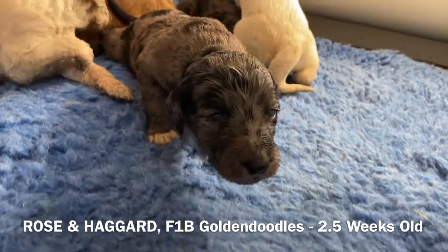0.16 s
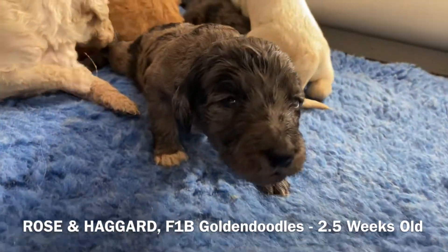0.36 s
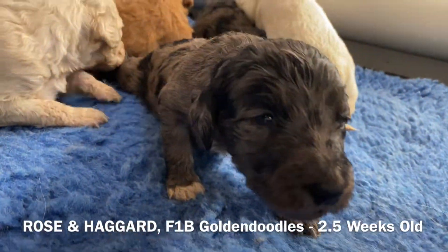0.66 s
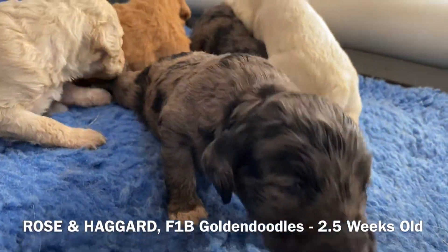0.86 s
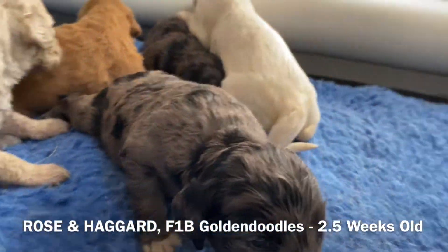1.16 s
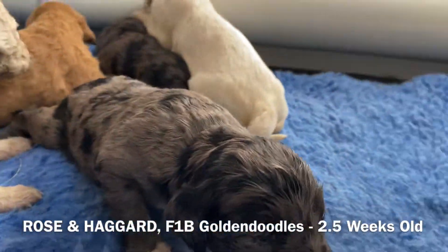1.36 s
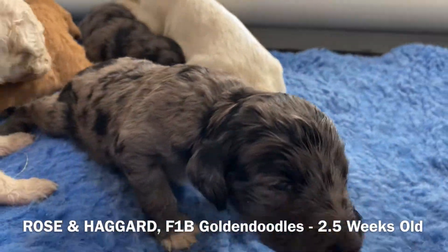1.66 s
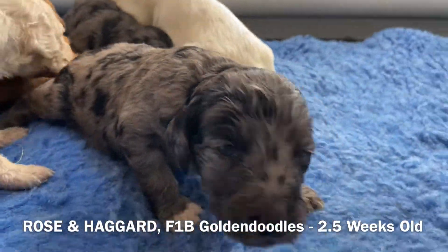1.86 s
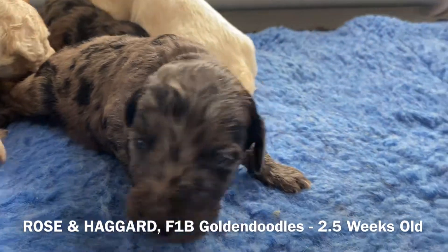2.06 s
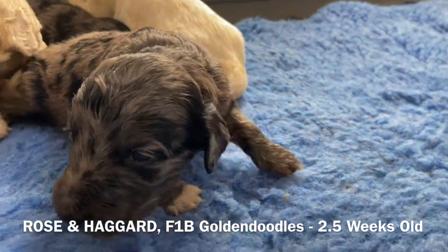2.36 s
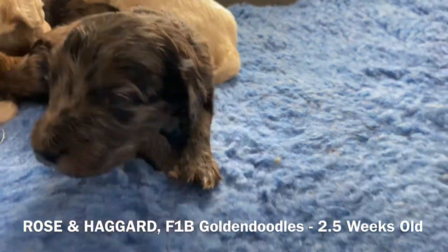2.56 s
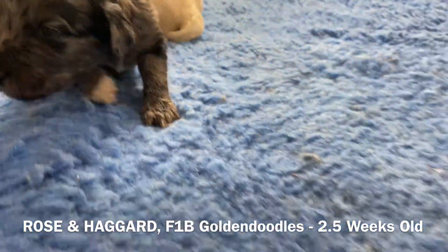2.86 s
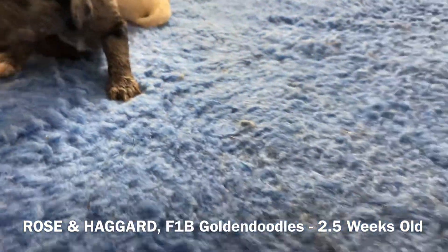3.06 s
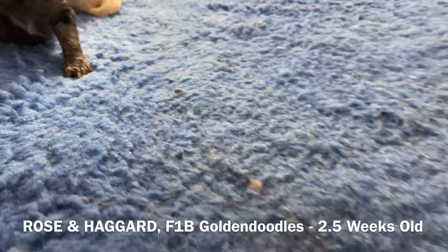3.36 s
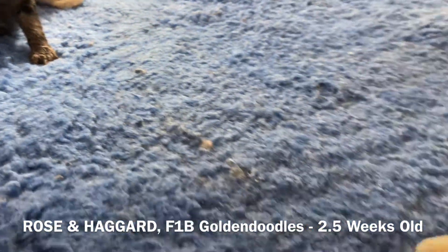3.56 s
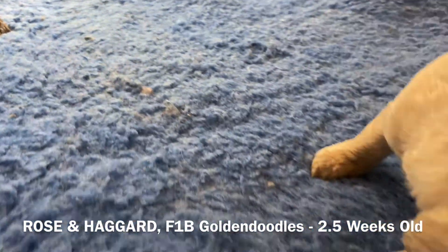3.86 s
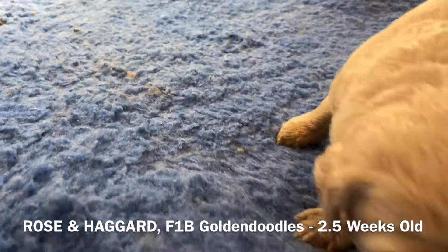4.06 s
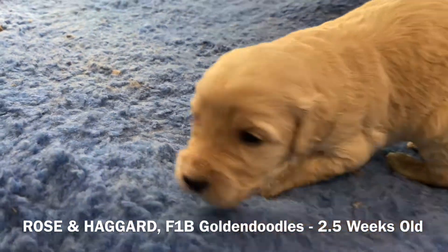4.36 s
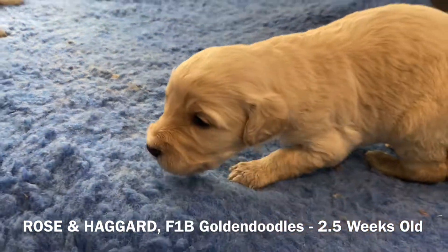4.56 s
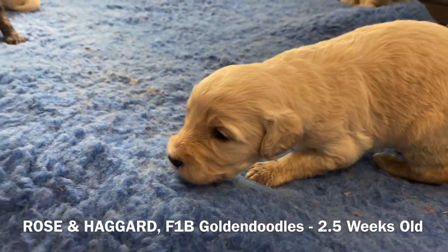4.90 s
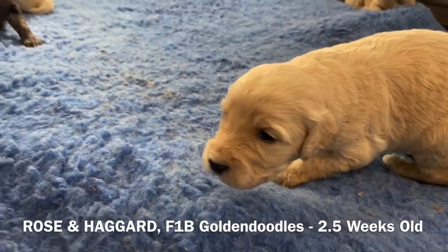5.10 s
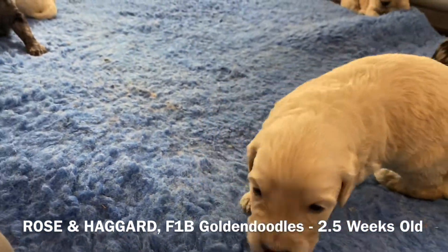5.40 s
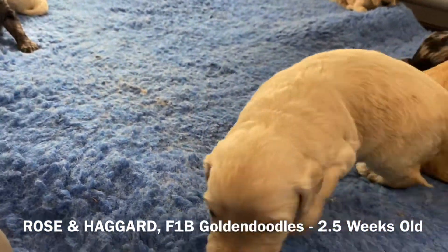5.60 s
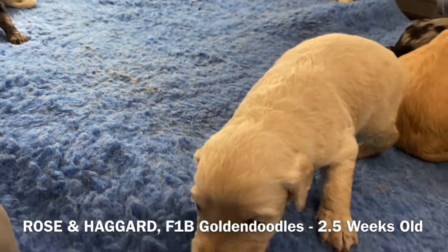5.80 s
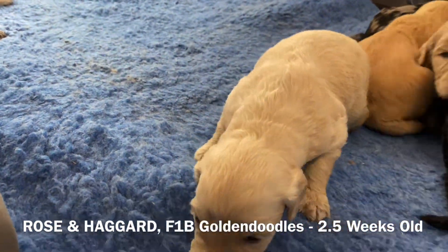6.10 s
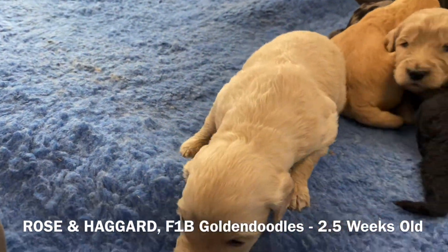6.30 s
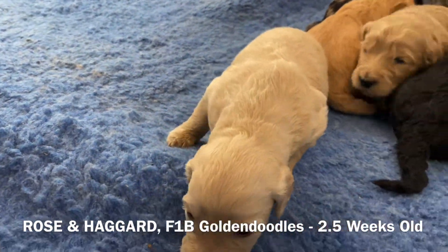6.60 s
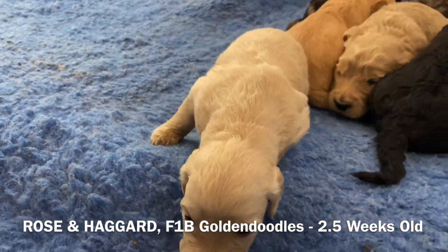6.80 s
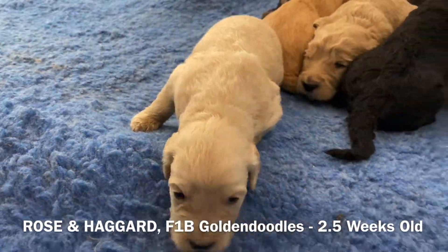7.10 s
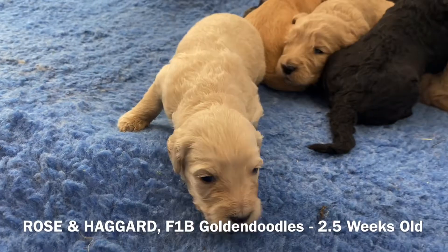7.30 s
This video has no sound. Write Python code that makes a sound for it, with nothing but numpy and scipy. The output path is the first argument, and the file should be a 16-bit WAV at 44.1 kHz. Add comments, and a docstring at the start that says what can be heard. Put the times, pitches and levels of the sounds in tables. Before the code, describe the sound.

Tiny puppies squeak and grunt on thick bedding, soft bumps underneath, one sharp knock, then a close groan sagging into a growl.

```python
"""A bare room with thick bedding, where young puppies lie, heard by a hand-held phone.
Far puppies whimper in shaky squeaks that the room draws out; near ones grunt and groan through closed
mouths: both are stacks of sine partials, and the grunts add breath noise. Noses whistle with wavering
sines; knocks, ticks and sniffs are short noise bursts, struck things ring in fading sines,
and shaken floor modes bump the phone under patchy noise for the air and stirring bodies."""
import sys
import numpy as np
from scipy import signal
from scipy.fft import rfft, irfft, next_fast_len
from scipy.io import wavfile
from scipy.ndimage import uniform_filter1d

SR = 44100
rng = np.random.default_rng(int(sys.argv[2]) if len(sys.argv) > 2 else 0)


def wav_out(sig):
    """Save sig, one row per channel (or a flat mono array), as 16-bit PCM at SR to the path in sys.argv[1]."""
    wavfile.write(sys.argv[1], SR, np.round(np.clip(np.atleast_2d(sig).T, -1, 1) * 32767).astype(np.int16))


N = 328545  # length of the scene [samples]

# How fast the room's echo dies in each band: (frequency [Hz], time to fall 60 dB [s])
ROOM_DECAY = [(100, 0.85), (500, 0.22), (1000, 0.56), (2500, 0.56), (5000, 0.47), (10000, 0.32)]
# Knocks, ticks and sniffs: (start [s], level [dB], rise [s], time to fall 60 dB [s],
# treble tilt [dB], positive is brighter)
NOISE_BURSTS = [(0, -43.5, 0.0006, 0.17, -5), (.555, -50, 0.021, 0.77, -5.5),
                (1.143, -54.5, 0.037, 0.27, 5.5), (2.162, -47.5, 0.011, 0.34, -1.5),
                (2.292, -38, 0.00032, 0.22, 1), (3.075, -48, 0.028, 1, 0.5),
                (3.61, -48.5, 0.00033, 0.083, -2), (3.682, -44, 0.0029, 0.24, -1.5),
                (3.841, -25.5, 0.00083, 0.07, 6.5), (3.853, -22, 0.0043, 0.03, -24),
                (4.166, -56, 0.015, 0.41, 2), (4.455, -50, 0.004, 0.25, 1.0),
                (5.099, -42, 0.19, 0.074, -40.5), (5.255, -49.5, 0.0054, 0.73, 6.5),
                (6.606, -42, 0.0075, 0.1, -12), (6.625, -42, 0.0031, 0.061, -4.5),
                (6.94, -49, 0.0016, 0.015, -3), (7.213, -42, 0.0017, 0.015, -6.5),
                (7.4, -51.5, 0.004, 0.44, 0.5)]


def amp(db):
    """Turn decibels into a plain factor."""
    return 10 ** (np.asarray(db) / 20)


def evened(x):
    """Scale a signal to an rms of 1."""
    return x / np.sqrt(np.mean(x ** 2) + 1e-20)


def read(points, hz):
    """Read a curve of (frequency, value) points, joined by straight lines over log frequency."""
    f, value = np.transpose(points)
    return np.interp(np.log(hz + 1), np.log(f + 1), value)


def add(mix, s, sound):
    """Lay a sound into the mix at s seconds, cut off at the end of the mix."""
    part = mix[round(s * SR):][:len(sound)]
    part += sound[:len(part)]


def columns(rows):
    """Give the start time, then every other column of a table at each sample."""
    s, *rest = np.transpose(rows)
    t = np.arange(s[0], s[-1], 1 / SR)
    return [s[0]] + [np.interp(t, s, c) for c in rest]


def wander(count, width_s):
    """Make a slow random drift of rms 1 by smoothing noise twice."""
    size = max(int(width_s * SR), 2)
    smooth = uniform_filter1d(rng.standard_normal(count), size)
    return evened(uniform_filter1d(smooth, size))


def coloured(count, points):
    """Make noise of rms 1 with the given spectrum."""
    hz = np.fft.rfftfreq(count, 1 / SR)
    spectrum = rfft(rng.standard_normal(count)) * amp(read(points, hz))
    return evened(irfft(spectrum, count))


def pair(a, b):
    """Mix two unrelated spectra (bins x frames) into partly alike ones for the two microphone ports."""
    # How alike the ports hear spread-out sound: (frequency [Hz], likeness [0-1])
    likeness = [(250, 0.53), (1100, 1), (2400, 0.032), (4500, 0.55), (10000, 1)]
    same = np.clip(read(likeness, np.linspace(0, SR / 2, len(a))), 0, 1)[:, None]
    return np.array([a, same * a + np.sqrt(1 - same ** 2) * b])


def bumps():
    """Shake floor modes at random, with duller shuffling above them; thuds climb and then die away."""
    # Thuds through floor and hand: (peak time [s], rise [s], time to fall 60 dB [s],
    # floor level [dB], shuffling level [dB])
    thuds = [(.14, 0.17, 0.7, -30.5, -68), (.97, 0.011, 0.74, -34, -61.5), (1.221, 0.48, 0.11, -44, -49),
             (1.869, 0.083, 0.88, -29.5, -48), (2.24, 0.073, 1.64, -36.5, -50.5),
             (2.78, 0.24, 0.72, -64, -47), (3.63, 0.091, 2.9, -41, -45), (3.8, 0.26, 0.23, -40, -64),
             (3.875, 0.011, 0.42, -23, -23), (3.959, 0.095, 0.57, -21, -53.5), (4.3, 0.38, 2.3, -41, -56.5),
             (6.08, 0.1, 0.16, -41.5, -56), (6.95, 0.25, 0.54, -41, -76), (7.1, 0.17, 0.32, -68, -51)]
    # Ways the floor likes to shake: (frequency [Hz], width [Hz], level [dB])
    floor_modes = [(55.1, 18.7, 2), (84.3, 11.2, -3), (108.4, 13, -15)]
    rest_db, rest_shuffle_db = -53, -59  # steady levels that the thuds add to
    thud_rise_db = 18.5  # climb during each rise time
    t, hz = np.arange(0, N, 64) / SR, np.fft.rfftfreq(N, 1 / SR)
    s, rise, t60, bump_db, shuffle_db = np.transpose(thuds)[:, :, None]
    shape_db = np.where(t < s, thud_rise_db * (t - s) / rise, -60 * (t - s) / t60)

    def strength(steady_db, peak_db):
        """Add the powers of the steady level and all thuds, at every sample."""
        power = amp(steady_db) ** 2 + (amp(peak_db + shape_db) ** 2).sum(0)
        return np.interp(np.arange(N) / SR, t, np.sqrt(power))

    modes = sum(amp(db) / (1 + (2 * (hz - f) / width) ** 2) for f, width, db in floor_modes)
    shake = signal.hilbert(irfft(rfft(rng.standard_normal(N)) * modes, N))
    shake = evened((shake / abs(shake) ** 0.046).real)  # dips slightly shallower than in free noise
    shuffle = coloured(N, [(110, -24), (150, 7.0), (220, -2.0), (330, -5.5), (600, -46.0), (1200, -59)])
    return strength(rest_db, bump_db) * shake + strength(rest_shuffle_db, shuffle_db) * shuffle


def air():
    """Make room air and soft rustle from noise that is patchy in time and pitch."""
    # Spectrum before stirring and patches: (frequency [Hz], level [dB per Hz])
    air_colour = [(30, -100.5), (60, -81), (200, -90.5), (350, -106), (520, -114), (850, -93.5),
                  (1300, -100), (3000, -115), (5000, -114), (8000, -123), (12000, -135), (16000, -146)]
    # How much the stirring bodies raise it: (time [s], rise [dB])
    stirring = [(0, 13.5), (.45, 4), (1.1, 5.5), (1.3, 7.5), (1.9, 0.5), (2.3, 17.5), (2.62, 8.5),
                (3.15, 17.5), (3.45, 13), (3.7, 15.5), (4.4, 7.5), (4.901, 5), (6.2, 12), (6.55, 7.5),
                (6.7, 8.5), (7.45, 12.5)]
    frames, hz = N // 256 + 5, np.fft.rfftfreq(1024, 1 / SR)
    a, b, c, d, patches = rng.standard_normal((frames, 513, 5)).T
    patches = evened(uniform_filter1d(uniform_filter1d(patches, 14, 0), 14, 1))
    db_per_bin = 10 * np.log10(SR / 1024)
    stir_db = np.interp(np.arange(frames) * 256 / SR, *np.transpose(stirring))
    level_db = read(air_colour, hz)[:, None] + db_per_bin + 3.32 * patches + stir_db
    z = pair(a + 1j * b, c + 1j * d) * amp(level_db)
    return signal.istft(z, nperseg=1024, noverlap=768)[1][:, :N]


def tilted(tilt_db):
    """Give a burst's spectrum as (frequency [Hz], level [dB]), with a strong hump at 800 Hz."""
    return [(100, 7), (400, -tilt_db), (800, 37.5), (12800, 4 * tilt_db), (16000, 4 * tilt_db - 11.0)]


def burst(level_db, rise, t60, tilt_db):
    """Make a knock, tick or sniff from tilted noise that rises and dies."""
    t = np.arange(16000) / SR
    noise = coloured(len(t), tilted(tilt_db))
    fall = amp(level_db - 60 * np.maximum(t - rise, 0) / t60)
    return fall * np.minimum(t / rise, 1) * noise


def burst_tails():
    """Add the spread-out echo after each burst: its spectrum dies band by band as the room does."""
    hz, t = np.fft.rfftfreq(256, 1 / SR), np.arange(N // 64 + 5) * 64 / SR
    power = np.zeros((len(hz), len(t)))
    for s, level_db, rise, t60, tilt_db in NOISE_BURSTS:
        colour = amp(read(tilted(tilt_db), hz)) ** 2
        colour = (colour / colour.sum())[:, None]
        since = np.maximum(t - s - rise - .006, 0)
        energy = amp(level_db) ** 2 * (rise + t60 / 5)
        decay = amp(-120 * since / read(ROOM_DECAY, hz)[:, None])  # 120, as this is power
        power += energy * colour * decay * (since > 0)
    a, b, c, d = rng.standard_normal((len(t), len(hz), 4)).T
    z = pair(a + 1j * b, c + 1j * d) * np.sqrt(power)
    return amp(13.5) * signal.istft(z, nperseg=256, noverlap=192)[1][:, :N]


def grunt(breath_db, first_db, rows):
    """Voice a closed mouth: rough folds shake pitch and strength and leak noise; breath puffs each cycle."""
    # Throat and closed mouth as a filter: (frequency [Hz], level [dB])
    throat = [(120, -18.5), (230, 2.5), (480, -7), (820, -2.5), (1050, -24), (1250, -19), (1600, -18),
              (2200, -29.5), (2700, -43), (3200, -49)]
    # Colour of the breath noise: (frequency [Hz], level [dB])
    breath_colour = [(1000, -19), (2000, -36), (3000, 9.5), (7300, 7), (8500, 13), (11800, 10.5),
                     (12800, -43), (16000, -38)]
    s, hz, effort_db, rough = columns(rows)
    count, k, rough = len(hz), np.arange(1, 14)[:, None], np.clip(rough, 0, 1)
    below_peak_db = effort_db - effort_db.max()
    turns = np.cumsum(hz * (1 + .05 * rough * wander(count, .005))) / SR

    # treble partials need full effort and smooth folds
    treble_db = (k * hz > 1300) * (.3 * below_peak_db - 12 * rough)
    partial_db = read(throat, k * hz) + first_db * (k == 1) + treble_db
    partials = amp(partial_db) * np.sin(2 * np.pi * k * turns - 1.414 * k * np.log(k))
    first, upper = partials[0], partials[1:].sum(0)

    # alternating strong and weak pulses add lines halfway between the partials
    shimmer = rough * (.6 * wander(count, .004) + 1.1 * np.cos(np.pi * turns))
    voice = first + upper + shimmer * (upper + .35 * first)  # the first partial stays steadiest
    voice += .5 * rough * first
    leak = .42 * rough ** 2 * coloured(count, throat)
    puffs = 0.27 + 0.87 * np.exp(-(turns % 1) / 0.18)
    fade_in = np.minimum(np.arange(count) / 600, 1)
    breath = amp(breath_db + 0.85 * below_peak_db) * fade_in * puffs * coloured(count, breath_colour)
    edge = np.minimum(1, np.minimum(np.arange(count), np.arange(count)[::-1]) / 80)
    return s, amp(effort_db) * ((1 - .5 * rough) * voice + leak + breath) * edge


def short_grunt(s, length, first_hz, last_hz, effort_db, rough, breath_db, first_db):
    """Give one push: it swells, fades, and slides most of the way to its last pitch by the middle."""
    share = np.array([0, .3, .7, 1])  # of the length; loudest at the second point
    hz = last_hz + (first_hz - last_hz) * (1 - share) ** 1.8
    shape_db = np.array([-9.5, 0, -3.0, -16.5])
    rows = np.transpose([s + length * share, hz, effort_db + shape_db, rough + 0 * share])
    return grunt(breath_db, first_db, rows)


def whimper(s, length, glide, first_hz, top_hz, shake, effort_db, drift_db, second_db, mouth_db):
    """Voice a shaky near-sine that glides, then sags; its treble opens towards its highest pitch."""
    # Third and higher partials, and leaking air: (frequency [Hz], level [dB])
    far_treble = [(1800, -5), (3300, -48.5), (5500, -26.5), (9000, -33.5), (13000, -53.5)]
    attack_s, release_s = 0.019, 0.025
    sag_hz_per_s = 475  # after the glide
    mouth_hz = 4830  # the mouth lifts partials near this resonance
    t = np.arange(0, length + release_s, 1 / SR)
    climb = np.sin(np.pi / 2 * np.minimum(t / glide, 1))
    hz = first_hz + (top_hz - first_hz) * climb ** 1.6 - sag_hz_per_s * np.maximum(t - glide, 0)
    hz = hz * (1 + shake * (.7 + .45 * climb) * wander(len(t), .004))  # shakes most after the glide
    effort_db = effort_db + drift_db * t / length

    turns, k = np.cumsum(hz) / SR, np.arange(3, 13)[:, None]
    lift = amp(mouth_db) / (1 + ((k * hz - mouth_hz) / 650) ** 2) ** 2
    treble = ((amp(read(far_treble, k * hz)) + lift) * np.sin(2 * np.pi * k * turns)).sum(0)
    treble *= amp(1.2 * (effort_db - effort_db.max())) * (hz / hz.max()) ** 6
    second = amp(second_db - 36 * np.log2(hz / 800)) * np.sin(4 * np.pi * turns)  # weaker at high pitch
    voice = np.sin(2 * np.pi * turns) + second + treble
    voice += amp(-31.0) * coloured(len(hz), far_treble)  # air leaking past the folds
    shake_db = (1 + 80 * shake) * wander(len(hz), .004)  # hoarse folds shake in strength too
    edge = np.clip(np.minimum(t / attack_s, t[::-1] / release_s), 0, 1) ** 2
    return s, amp(effort_db + shake_db) * voice * edge


def whistle(s, length, hz, glide, tone_db, octave_db):
    """Blow air through a narrow nostril: a wavering sine and its octave, gliding up, swelling and fading."""
    count = int(length * SR)
    below = glide * np.linspace(1, 0, count) ** 2
    turns = np.cumsum(hz * (1 + .007 * wander(count, .003) - below)) / SR
    tone = amp(tone_db) * np.sin(2 * np.pi * turns) + amp(octave_db) * np.sin(4 * np.pi * turns)
    return s, tone * amp(3 * wander(count, .004)) * signal.windows.tukey(count, .8)


def slam():
    """Ring a struck thing: its low modes build up a little later than the high ones."""
    # Ringing modes: (frequency [Hz], level [dB], time to fall 60 dB [s])
    slam_modes = [(60, -13.5, 0.33), (108.7, 5, 0.11), (215, -12.5, 0.14), (457, -22.5, 0.082),
                  (850, 5.5, 0.015), (1310, 3, 0.013)]
    start_s, level_db = 3.845, -8.5
    t, out = np.arange(SR) / SR, np.zeros(N)
    for hz, db, t60 in slam_modes:
        build_up = np.minimum(t * hz / 1.68, 1) ** 3
        add(out, start_s, amp(level_db + db - 60 * t / t60) * build_up * np.sin(2 * np.pi * hz * t))
    return out


def knock():
    """Nudge something hollow that scrapes briefly: a short noisy rub drives its modes."""
    # Ringing modes: (frequency [Hz], peak level [dB], time to fall 60 dB [s])
    hollow_modes = [(940, 0, .06), (1400, 2, .08), (2150, -5, .008), (3550, -6, .005), (4250, -7, .006),
                    (5400, -8, .003)]
    start_s, level_db, rub_s = 4.449, -44, .05
    t, out = np.arange(4000) / SR, np.zeros(N)
    count = int(rub_s * SR)
    rub = rng.standard_normal(count) * signal.windows.tukey(count, .3)
    for hz, db, t60 in hollow_modes:
        ring = signal.fftconvolve(rub, amp(-60 * t / t60) * np.sin(2 * np.pi * hz * t))
        add(out, start_s, amp(level_db + db) * ring / abs(ring).max())
    return out


def room(x):
    """Echo a sound with dense random reflections, each band dying at its own speed."""
    hz, t, z = signal.stft(rng.standard_normal((2, SR)), SR, nperseg=256)
    decay = amp(-60 * t / read(ROOM_DECAY, hz)[:, None])
    tail = signal.istft(pair(*z) * decay, SR, nperseg=256)[1]
    spectrum = rfft(tail)
    power = abs(spectrum) ** 2
    level = np.sqrt(uniform_filter1d(power, size=25) / uniform_filter1d(power, size=401))
    tail = irfft(spectrum / level, tail.shape[1])  # no pitch is much favoured
    count = tail.shape[1]
    tail = tail * np.clip(np.linspace(3, 0, count), 0, 1) ** 2  # the last third fades to nothing
    tail = tail * np.clip((np.arange(count) / SR - .004) / .015, 0, 1)  # echoes gather
    return signal.fftconvolve(x[None], tail / np.linalg.norm(tail[0]), axes=1)[:, :N]


def scene():
    """Mix the sources: far voices mix direct sound with echo in varying shares, near ones are mostly direct."""
    # Short near grunts: (start [s], length [s], first pitch [Hz], last pitch [Hz], effort [dB],
    # roughness [0-1, more counts as 1], breath against effort [dB], first partial boost [dB])
    grunts = [(0.113, 0.089, 440.5, 363.5, -41.5, 0.04, -53, 8),
              (0.541, 0.13, 328, 579, -33.5, 0.48, -34.5, 1.5),
              (1.732, 0.055, 298, 293.6, -48.5, 0.6, -59, 6), (1.955, 0.31, 280.1, 245.5, -38, 0.8, -43, 5),
              (2.718, 0.13, 239.5, 221.8, -42, 1.05, -31, 1), (3.084, 0.11, 251, 260, -41.5, 0.95, -35, -7),
              (3.603, 0.057, 215, 200.4, -40, 0.87, -36, 7),
              (3.669, 0.084, 200.6, 197.6, -39.5, 0.82, -50, 1.5),
              (7.083, 0.056, 420, 376, -42.5, 0.56, -54, -5.5),
              (5.759, 0.21, 278.2, 238.2, -39, 0.48, -27.5, -1.5)]
    # Far whimpers: (start [s], length before release [s], glide [s], first pitch [Hz],
    # glide's end pitch [Hz], basic pitch shake [share], effort [dB], drift over the length [dB],
    # second partial at 800 Hz [dB], mouth lift [dB], echo send against the cry [dB])
    whimpers = [ (0.195, 0.083, 0.068, 624, 873, 0.032, -34.5, -15, -11, -56, 0.4),
                (0.772, 0.043, 0.038, 704, 983, 0.035, -47.5, 2, -15, -40, -10),
                (0.801, 0.069, 0.092, 621, 863, 0.037, -42.5, 4, -17.5, -19.5, -1.7),
                (1.179, 0.13, 0.076, 687, 979, 0.0253, -38, -1, -13.5, -18.5, 0.5),
                (1.552, 0.069, 0.039, 637, 953, 0.0143, -33.5, -3.5, -12, -18.5, 0.8),
                (1.925, 0.11, 0.084, 730, 984, 0.022, -34.5, -1, -11, -14.5, -2.3),
                (2.315, 0.105, 0.03, 915, 952, 0.003, -24.5, -6, -26, -16, -8),
                (2.637, 0.11, 0.08, 652, 956, 0.018, -40.5, -0.5, -12, -16.5, 2.8),
                (2.982, 0.13, 0.09, 656, 965, 0.013, -38.5, 0.5, -7.5, -26.5, 0.4),
                (3.335, 0.08, 0.087, 671, 938, 0.028, -33.5, 1, -10.5, -21, -5.5),
                (3.542, 0.08, 0.092, 695, 554.6, 0.025, -34.5, -7.5, -20, -53, -3.5),
                (3.696, 0.063, 0.034, 648, 754, 0.045, -38.5, -12.5, -12, -48, -6),
                (4.672, 0.051, 0.052, 839, 946, 0.037, -47.5, -3, -11, -37, -6.5),
                (4.967, 0.091, 0.049, 691, 731, 0.032, -44, -13, -20, -44, -1.5),
                (5.983, 0.056, 0.055, 850, 993, 0.014, -44.5, 2, -10, -31, -5),
                (6.256, 0.082, 0.087, 762, 1310, 0.019, -46.5, 4.5, -13.5, -49, 3.7),
                (6.593, 0.14, 0.11, 661, 964, 0.039, -42, -4.5, -16, -44, -0.7),
                (6.637, 0.041, 0.042, 884, 1099, 0.045, -39.5, -7, -7.5, -19, 2.7),
                (6.955, 0.14, .1, 744, 1012, 0.045, -45, 2, -19, -27, -3.2),
                (7.326, 0.061, 0.033, 818, 953, 0.015, -43.5, -5.5, -28, -37, -11),
                (7.409, 0.06, 0.033, 672, 680, 0.023, -45, 1.5, -12, -33, 1)]
    # Thin nose whistles: (start [s], length [s], end pitch [Hz], upward glide [share of pitch],
    # tone before mixing [dB], octave before mixing [dB])
    whistles = [(2.714, 0.067, 3803, 0.048, -46.5, -59), (3.034, 0.12, 3590, .04, -49, -55),
                (6.339, 0.11, 4080, 0.076, -64.5, -105), (6.441, 0.057, 2900, 0.0069, -67, -110),
                (6.465, 0.2, 10580, .03, -76, -120), (6.694, 0.098, 3676, 0.0054, -66.5, -65),
                (7.166, 0.077, 3980, .04, -73, -105)]
    # The long near groan: (time [s], pitch [Hz], effort [dB], roughness [0-1])
    groan = [(5.212, 440, -25, 0.3), (5.23, 414, -23, 0.2), (5.3, 436, -22.5, 0.2), (5.34, 320, -21, 0.15),
             (5.4, 285, -22, 0.2), (5.422, 247, -24, 0.4), (5.49, 233, -24, 0.7), (5.55, 254, -22, 0.55),
             (5.62, 232, -24, 0.85), (5.66, 218, -24, .9), (5.73, 218, -27, 0.9), (5.79, 192, -38, .8)]
    far, far_wet, nose, near, hits = np.zeros((5, N))
    for s, level_db, rise, t60, tilt_db in NOISE_BURSTS:
        add(hits, s, burst(level_db, rise, t60, tilt_db))
    for call in grunts:
        add(near, *short_grunt(*call))
    for *call, echo_db in whimpers:
        s, cry = whimper(*call)
        add(far, s, cry)
        add(far_wet, s, amp(echo_db) * cry)
    for row in whistles:
        add(nose, *whistle(*row))
    blows = slam()
    nudge = knock()
    add(near, *grunt(breath_db=-26.5, first_db=-5, rows=groan))
    to_room = far_wet + amp(-1) * nose + amp(-10.5) * near + amp(-10.0) * blows + nudge
    echo = room(to_room) + burst_tails()
    direct = amp(-2.5) * far + amp(1.0) * nose + near + hits + blows + nudge
    return direct + echo + bumps() + air()


def record(dry):
    """Hear the scene through two ports that differ in phase and level, then cut the highest treble."""
    # Level difference of the ports: (frequency [Hz], left minus right [dB])
    port_balance = [(230, 0), (460, 12), (640, 3.5), (820, 2), (920, -.3), (1220, -.5), (1420, 4.5),
                    (1600, .5), (2400, 2.5), (4400, -1), (8000, 0)]
    # Phase difference of the ports: (frequency [Hz], lead of the left [radians])
    port_phase = [(0, .8), (170, 0), (420, .8), (600, -2.3), (800, -1.87), (950, -2.33), (1290, -3.18),
                  (1500, -4.0), (2100, -4.5), (5100, -5.9), (9730, -.2), (11800, 1), (12400, 3.0),
                  (14500, 3.3), (15300, 5.9)]
    edge_hz = 15900
    size = next_fast_len(N + 4096)
    hz = np.fft.rfftfreq(size, 1 / SR)
    # each port takes half of the difference, in opposite directions
    half = amp(read(port_balance, hz) / 2) * np.exp(.5j * np.interp(hz, *np.transpose(port_phase)))
    ports = irfft(rfft(dry, size) * np.array([half, 1 / half]), size)[:, :N]
    low_pass = signal.firwin(511, edge_hz, window=("kaiser", 9), fs=SR)
    return signal.oaconvolve(ports, low_pass[None], "same")


dry = scene()
out = record(dry)
wav_out(out)
```